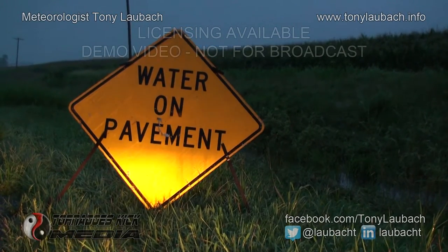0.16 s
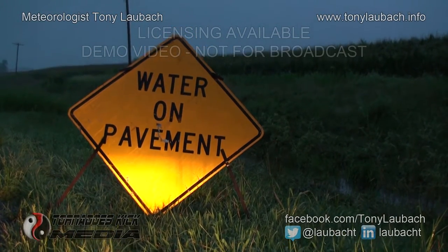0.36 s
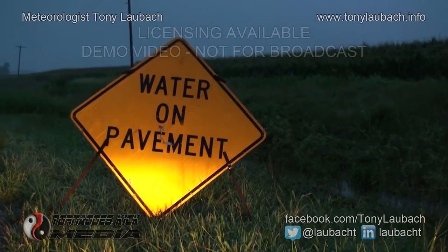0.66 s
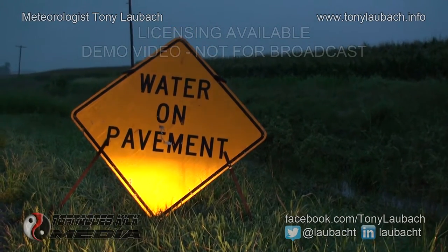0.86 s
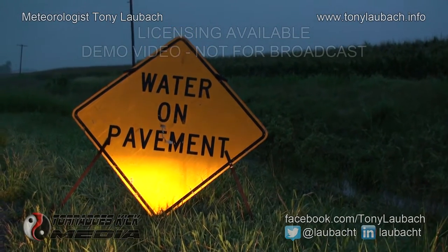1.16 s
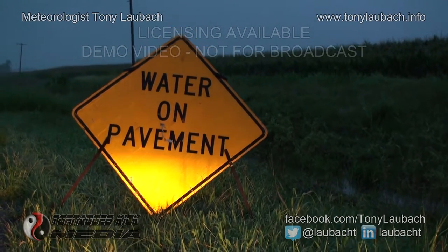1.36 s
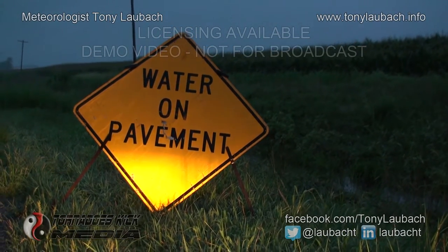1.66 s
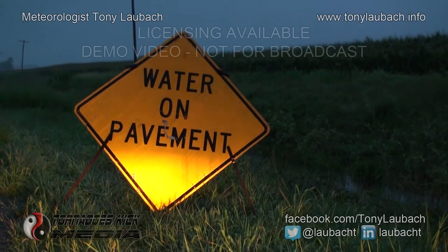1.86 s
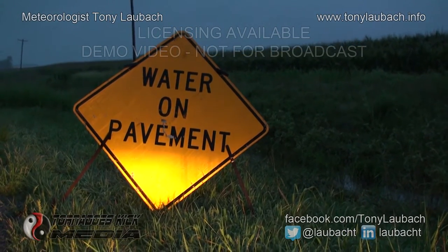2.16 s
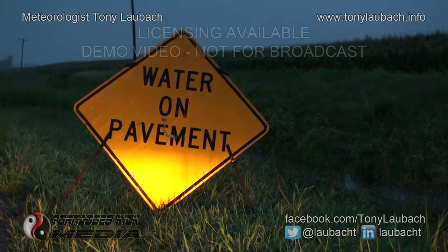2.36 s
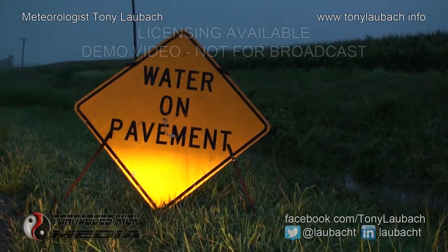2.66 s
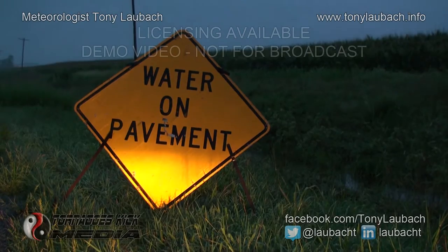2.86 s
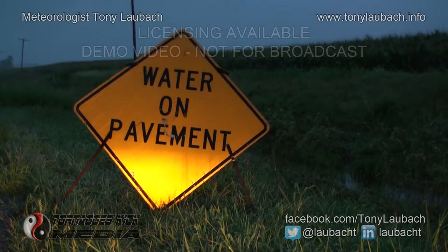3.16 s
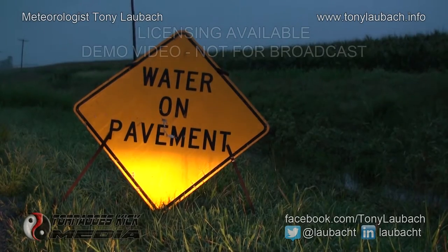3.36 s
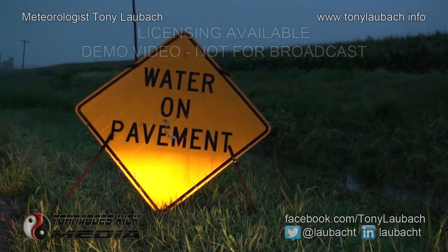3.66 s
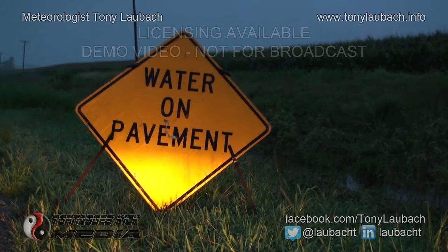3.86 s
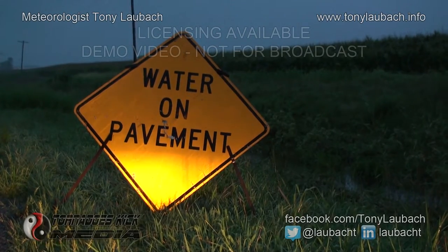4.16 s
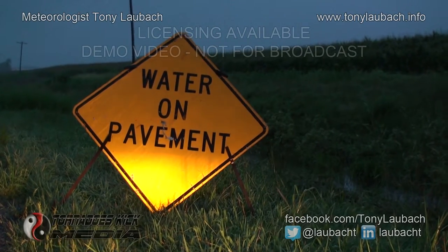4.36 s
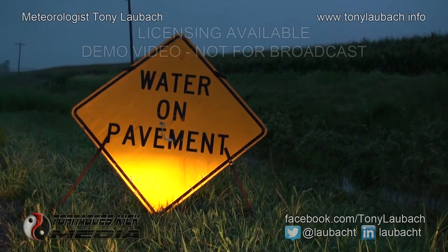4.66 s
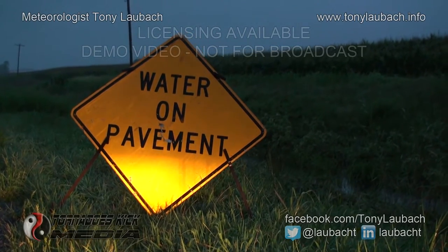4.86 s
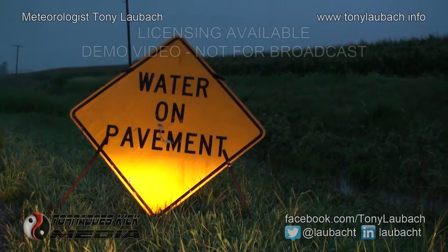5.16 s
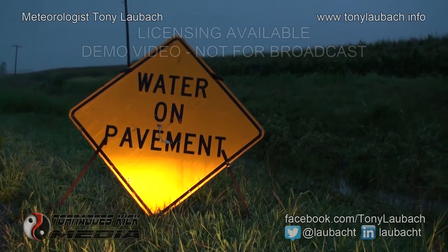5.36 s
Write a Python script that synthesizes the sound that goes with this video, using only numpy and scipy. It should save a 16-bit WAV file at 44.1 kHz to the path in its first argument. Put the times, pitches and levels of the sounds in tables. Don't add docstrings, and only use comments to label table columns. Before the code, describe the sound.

Outdoors at dusk, wet tyres draw nearer through puddles, splashing and hissing ever louder until the car sweeps close by on the left.

```python
import sys
import numpy as np
from scipy import signal
from scipy.fft import rfft, irfft, next_fast_len
from scipy.io import wavfile
from scipy.ndimage import uniform_filter1d, map_coordinates

SR = 44100
rng = np.random.default_rng(int(sys.argv[2]) if len(sys.argv) > 2 else 0)


def int16_out(signal):
    q = np.round(np.clip(np.atleast_2d(signal).T, -1, 1) * 32767)
    wavfile.write(sys.argv[1], SR, q.astype(np.int16))


def how_loud(loudness_db):
    steps = np.asarray(loudness_db, float) / 20
    return 10 ** steps


N = 242991
T = np.arange(N) / SR
FRAME = 1024

# [f/Hz, level/dB]
TRAFFIC_COLOUR = [(25, -22), (50, -30), (85, -9), (150, -14), (220, -7.5), (320, -6), (450, -11), (800, -6),
                  (1400, -7.5), (2100, -17.5), (3500, -20.5), (6500, -23.5), (9000, -24), (14000, -40)]
# [lag/ms, polarity, level/dB]
NEARBY_ECHOES = [(0.84, 1, -15.5), (1.12, -1, -27), (0.87, -1, -17)]
# [f/Hz, half width/Hz, level/dB]
INSECT_CHORUSES = [(7080, 520, -55.5), (8020, 120, -65.5), (6070, 230, -62)]
# [f/Hz, level/dB]
IDLE_TONES = [(38, -63), (75.5, -61), (97, -52), (136, -59.5), (205, -53.5)]

# [f/Hz, level/dB]
RUMBLE_COLOUR = [(25, -40), (50, -10), (90, -3.5), (140, 0.5), (190, -1), (260, -7.5), (500, -120)]
DRONE_COLOUR = [(100, -37), (190, -3.5), (270, 2.5), (330, 3), (400, -4), (600, -11), (1300, -120)]
ROAR_COLOUR = [(200, -26), (350, -1), (480, -2), (680, 1.5), (800, -1.5), (1200, 3), (1700, 2.5),
               (2300, -4.5), (4000, -120)]
SLAP_COLOUR = [(800, -32), (1500, -7), (1900, 1.5), (2150, -0.5), (2500, 1.5), (3200, -2), (4500, -14),
               (8000, -120)]
SPLASH_COLOUR = [(1700, -37), (2900, -6), (3400, 0), (4300, 0), (5100, -3.5), (6500, -16), (12000, -120)]
HISS_COLOUR = [(3000, -26), (4900, -2.5), (5600, 0), (7000, 0), (8300, -2), (9300, -5.5), (12000, -23.5),
               (16000, -60)]
MIST_COLOUR = [(5500, -35), (8300, -3.5), (9500, 0.5), (11600, 0.5), (12500, -4), (13800, -9.5),
               (15900, -19)]
# [t/s, f/Hz, level/dB]
FIRING_TONE = [(.8, 291.3, -73), (1.5, 289.6, -58), (2.3, 289.2, -57), (3, 286.8, -53), (3.6, 280.3, -44.5),
               (4.2, 277.4, -48.5), (4.6, 269, -54), (5.2, 253, -63)]
# [t/s, half length/s, rumble/dB, drone/dB]
PEDAL_MOVES = [
    (3.1, 0.17, -2.5, -2),
    (3.346, 0.11, 5, 0),
]

# [t/s, nearness/dB]
NEARNESS = [(0, -21), (.3, -18.5), (1.1, -18), (2, -13), (2.76, -8), (3.6, -2.5), (4.2, 0.65), (4.7, -0.4),
            (5.3, 0)]
PASS_S, ASIDE_S = 5.314, 0.28
LEVEL_RULES = {"roar": (-33.5, 1.03, -0.01, 0.8, -25), "slap": (-32, 1.07, 0.0848, -0.4, 7),
               "splash": (-29.5, 1.28, -0.02, 0.6, -63), "hiss": (-27, 1.55, 0.59, 6, -41),
               "mist": (-29, 1.28, 0.88, 1.2, -20), "rumble": (-43, 0.56, -0.1, 3.5, 14),
               "drone": (-40, 0.65, .16, -2.3, -9)}
# [enter t/s, leave t/s, depth at entry/dB, depth at exit/dB]
PUDDLE_CROSSINGS = [(1.75, 2.2, -2, -3), (2.234, 2.3, 7, 5), (2.5, 2.78, 1.5, 1.5),
                    (2.996, 3.57, 9.5, 10.5), (3.595, 3.82, 5.5, 6), (3.89, 4.423, 9, 9.5),
                    (4.446, 5.072, 12, 11.5), (5.09, 5.406, 5.5, 0.5)]
SHALLOW_DB = -12
WET_RISE_S, WET_FALL_S = 0.04, 0.065
# [t/s, half length/s, slap/dB, splash/dB, hiss/dB]
WATER_CHANGES = [
    (1.6, 0.46, 1, -3, -2),
    (2.12, 0.077, 2, 0, 6),
    (2.85, .25, 0, 2.5, .5),
    (3.38, .07, -0.5, -0.5, -4),
    (4.4, 0.094, 1.5, 0, 1.5),
    (4.85, 0.33, -1.5, -1, 0),
    (5.2, 0.065, 1, 1.5, -.5),
]

# [polarity, level/dB, lag when far/ms, lag when abreast/ms]
CAR_ECHOES = [
    (-1, -21, 1.48, 1.074),
    (1, -23, 1.29, 1),
    (-1, -23.5, 1.075, 0.693),
]
LAG_BEND = 0.56
DIP_HZ, DIP_RISE_HZ, DIP_WIDTH_HZ = 2170, 900, 180
DIP_DB, DIP_S, DIP_HALF_S = -5, 4.75, 0.32

# [f/Hz, likeness]
MICS_AROUND = [
    [(60, 0.5), (110, -4), (200, -3), (380, -3), (700, -1.5), (1290, -1.5), (2380, -5), (4400, -2), (8120, 0), (15000, 0.5)],
    [(100, -0.22), (650, 0.33), (1700, 0.017), (2500, 0.32), (3200, -0.12), (8000, -.3), (10000, 0)],
    [(60, 1.0), (130, 1), (290, 1), (640, 0.91), (1410, 0.53), (3100, 0.33), (6820, 0.92), (15000, 0.4)],
]
MICS_AHEAD = [
    [(60, 1.5), (92, 1.5), (140, 2.3), (210, 1.4), (330, 1.1), (500, 0.65), (770, 0.59), (1170, 3.2), (1790, 1.2), (2740, 3.2), (4190, 2.2), (6410, 3.1), (9810, 3.9), (15000, 5.3)],
    [(100, -0.19), (650, 0.77), (900, 0.1), (1700, -0.27), (2600, 0.48), (3000, -0.63), (3400, 0.28), (4000, -0.093)],
    [(60, 1.04), (130, .99), (290, 1.09), (640, 0.71), (1400, 1.1), (2500, 0.9), (4000, 1), (15000, 1.12)],
]
MICS_ABREAST = [
    [(60, 3.0), (110, 6.1), (200, 5.2), (380, 11.5), (700, 18.4), (1290, 9), (2380, 6.5), (4400, 8.3), (8120, 4.9), (15000, 1.0)],
    [(100, -0.1), (650, -0.1), (1000, -2), (2200, -0.92), (3500, 0.55), (8000, -0.2), (11000, 2.2), (11600, 1.4)],
    [(60, 0.78), (130, 0.99), (290, 0.5), (640, 0.75), (1400, 0.8), (2500, 0.94), (4500, 0.92), (7000, 0.95), (10500, 0.63), (12000, 0.81)],
]
# [f/Hz, level/dB]
ABREAST_COLOUR = [(60, -4), (150, 2), (300, 0.5), (600, 0.5), (1200, -1), (1800, -1), (2400, 4),
                  (3000, 1.5), (4500, -1.5), (7500, 1), (11500, 4), (15000, 10)]
# [t/s, 2 kHz ring/dB, body knock/dB]
HANDLING_TICKS = [
    (1.369, -36, -34),
    (1.4375, -52.5, -50),
]


def unit(x):
    return x / np.sqrt(np.mean(x ** 2) + 1e-20)


def along(points, hz):
    f, v = np.transpose(points)
    return np.interp(np.log(hz + 1), np.log(f + 1), v)


def curves(rows):
    s, *columns = np.transpose(rows)
    return [np.interp(T, s, column) for column in columns]


def bumps(rows):
    return sum(np.outer(db, np.exp(-((T - s) / half) ** 2)) for s, half, *db in rows)


def wobble(rate):
    return map_coordinates(rng.standard_normal(int(N * rate / SR) + 4), [T * rate])


def filtered(x, response):
    m = next_fast_len(N + 8192)
    return irfft(rfft(x, m) * response(np.fft.rfftfreq(m, 1 / SR)), m)[..., :N]


def rush(colour, patchy_db, drops=0):
    z = signal.stft(rng.standard_normal((2, N)), nperseg=512)[2]
    patches = uniform_filter1d(rng.standard_normal(z.shape[1:]), size=7, axis=0)
    patches = uniform_filter1d(patches, size=10, axis=1)
    pair = signal.istft(z * how_loud(patchy_db * unit(patches)), nperseg=512)[1][:, :N]
    hits = (rng.random((2, N)) < 1500 / SR) * rng.standard_normal((2, N))
    return unit(filtered(unit(pair) + drops * unit(hits), lambda hz: how_loud(along(colour, hz))))


def hum(hz, drift_hz, flutter_db):
    phase = 2 * np.pi * np.cumsum(hz + drift_hz * wobble(5.5)) / SR
    return np.sqrt(2) * how_loud(flutter_db * wobble(9.8)) * np.sin(phase)


def late(pair, ms):
    dull = filtered(pair, lambda hz: 1 / (1 + (hz / 8000) ** 2))
    return np.array([map_coordinates(v, [np.arange(N) - ms * SR / 1000], order=3) for v in dull])


def microphones(pair, start, end, direction, colour=((1, 0), (2, 0))):
    hz, s, (one, other) = signal.stft(pair, SR, nperseg=FRAME)
    share = np.clip(np.interp(s, T, direction), 0, 1)
    balance, lead, alike = (
        np.outer(along(a, hz), 1 - share) + np.outer(along(b, hz), share) for a, b in zip(start, end))
    spread = np.arccos(np.clip(alike, 0, 1)) / 2
    direct, scatter = np.cos(spread) * one, np.sin(spread) * other
    half = how_loud(balance / 2) * np.exp(0.5j * lead)
    both = np.array([(direct + scatter) * half, (direct - scatter) / half])
    both = both * how_loud(np.outer(along(colour, hz), share))
    return signal.istft(both, SR, nperseg=FRAME)[1][:, :N]


def traffic():
    wash = how_loud(-46) * rush(TRAFFIC_COLOUR, patchy_db=1.0)
    return wash + sum(sign * how_loud(db) * late(wash, ms) for ms, sign, db in NEARBY_ECHOES)


def insects():
    chorus = np.zeros((2, N))
    for hz, width, db in INSECT_CHORUSES:
        noise = rng.standard_normal((2, N))
        band = filtered(noise, lambda f: np.exp(-((f - hz) / width) ** 4))
        chorus += how_loud(db + 0.7 * wobble(9.9)) * unit(band)
    return chorus


def parked_engine():
    return sum(how_loud(db) * hum(hz, 0.7, 1.5) for hz, db in IDLE_TONES)


def background():
    return microphones(traffic() + insects(), MICS_AROUND, MICS_AROUND, 0 * T) + parked_engine()


def bearing():
    return np.arctan2(ASIDE_S, PASS_S - T) / (np.pi / 2)


def water():
    depth = SHALLOW_DB
    for enter, leave, enter_db, leave_db in PUDDLE_CROSSINGS:
        rise = 0.5 + 0.5 * np.tanh((T - enter) / WET_RISE_S)
        fall = 0.5 + 0.5 * np.tanh((leave - T) / WET_FALL_S)
        depth = depth + np.interp(T, [enter, leave], [enter_db, leave_db]) * rise * fall
    return depth


def level(layer):
    top_db, near, wet, abreast_db, leaving_db = LEVEL_RULES[layer]
    coming = top_db + near * curves(NEARNESS)[0] + wet * water()
    return coming + abreast_db * bearing() + leaving_db * np.clip(T - PASS_S, 0, None)


def engine():
    rumble_db, drone_db = [level("rumble"), level("drone")] + bumps(PEDAL_MOVES)
    rumble = how_loud(rumble_db) * rush(RUMBLE_COLOUR, patchy_db=0.0)
    drone = how_loud(drone_db) * rush(DRONE_COLOUR, patchy_db=1.5)
    firing_hz, firing_db = curves(FIRING_TONE)
    tones = how_loud(firing_db) * hum(firing_hz, 3, 4)
    tones = tones + how_loud(firing_db - 4) * hum(firing_hz / 2, 1.5, 4)
    return rumble + drone + tones * [[1], [0]]


def tyres():
    water_db = [level("slap"), level("splash"), level("hiss")]
    slap_db, splash_db, hiss_db = water_db + bumps(WATER_CHANGES)
    surge = wobble(11)
    mist_db = level("mist") + 0.14 * surge + 0.57 * wobble(23)
    roar = how_loud(level("roar") + 0.11 * surge) * rush(ROAR_COLOUR, patchy_db=0.13, drops=0.17)
    slap = how_loud(slap_db + 0.39 * surge) * rush(SLAP_COLOUR, patchy_db=0.8, drops=0.33)
    splash = how_loud(splash_db + 0.38 * surge) * rush(SPLASH_COLOUR, patchy_db=0.72, drops=0.45)
    hiss = how_loud(hiss_db + 0.4 * surge) * rush(HISS_COLOUR, patchy_db=0.8, drops=0.38)
    mist = how_loud(mist_db) * rush(MIST_COLOUR, patchy_db=2.1, drops=0.42)
    return roar + slap + splash + hiss + mist


def road_dip(pair):
    hz, s, z = signal.stft(pair, SR, nperseg=FRAME)
    centre = DIP_HZ + DIP_RISE_HZ * np.interp(s, T, bearing())
    off_pitch = (hz[:, None] - centre) / DIP_WIDTH_HZ
    off_time = (s - DIP_S) / DIP_HALF_S
    dip_db = DIP_DB * np.exp(-off_pitch ** 2 - off_time ** 2)
    return signal.istft(z * how_loud(dip_db), SR, nperseg=FRAME)[1][:, :N]


def passing_car():
    car = engine() + tyres()
    closing = bearing() ** LAG_BEND
    echoes = sum(sign * how_loud(db) * late(car, far + (close - far) * closing)
                 for sign, db, far, close in CAR_ECHOES)
    return microphones(road_dip(car + echoes), MICS_AHEAD, MICS_ABREAST, bearing(), ABREAST_COLOUR)


def ticks_on_camera():
    out = np.zeros((2, N))
    for s, ring_db, knock_db in HANDLING_TICKS:
        t = np.clip(T - s, 0, None)
        ring = how_loud(ring_db - 60 * t / 0.034) * np.sin(2 * np.pi * 2020 * t)
        body = np.sin(2 * np.pi * 700 * t) + 0.31 * np.sin(2 * np.pi * 1450 * t)
        click = 0.5 * how_loud(-60 * t / 0.004) * np.sin(2 * np.pi * 3100 * t)
        knock = how_loud(knock_db - 60 * t / 0.024) * (body + click)
        out += ring + knock * [[1.3], [-0.4]]
    return out


def scene():
    return background() + passing_car() + ticks_on_camera()


def roll_off(x):
    return signal.sosfilt(signal.butter(12, 15680, fs=SR, output="sos"), x)


def record(dry):
    return roll_off(dry)


dry = scene()
out = record(dry)
int16_out(out)
```